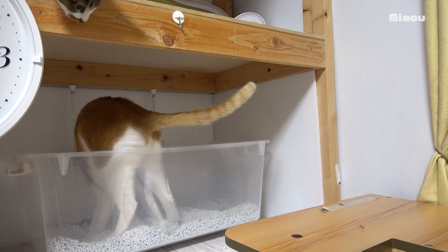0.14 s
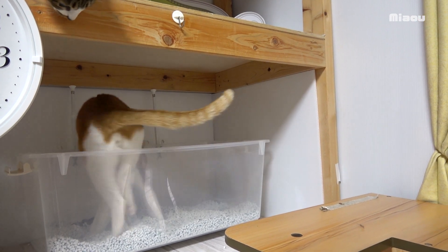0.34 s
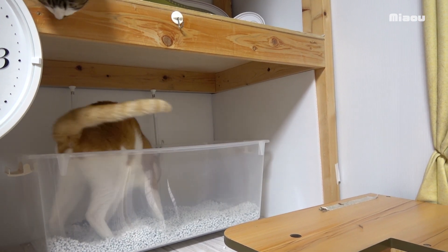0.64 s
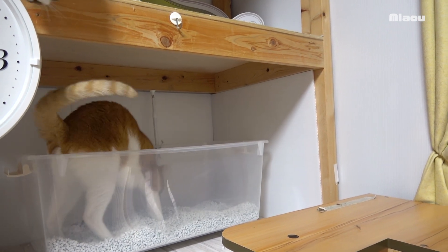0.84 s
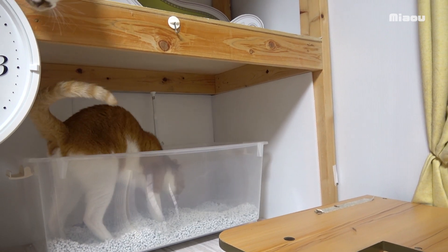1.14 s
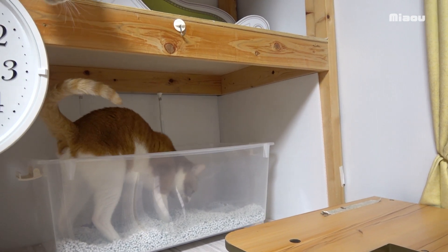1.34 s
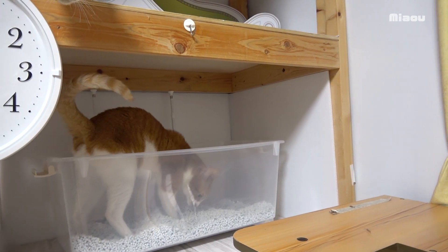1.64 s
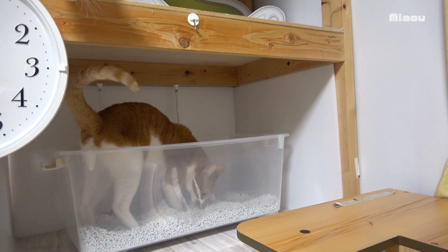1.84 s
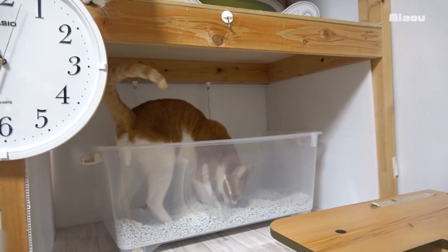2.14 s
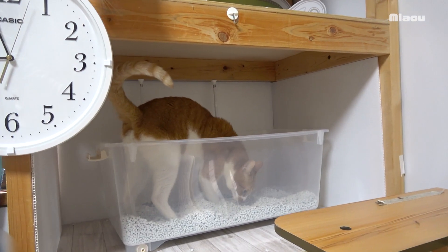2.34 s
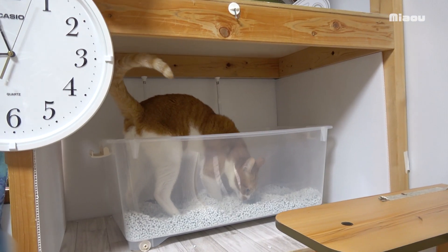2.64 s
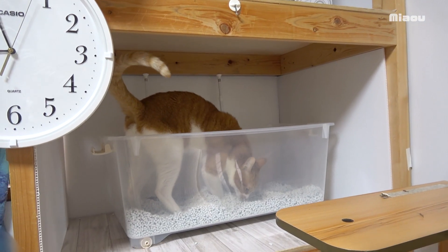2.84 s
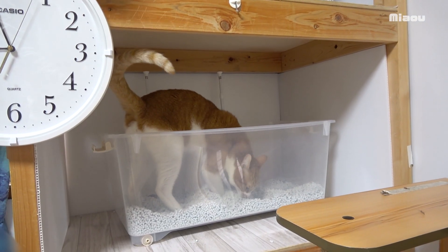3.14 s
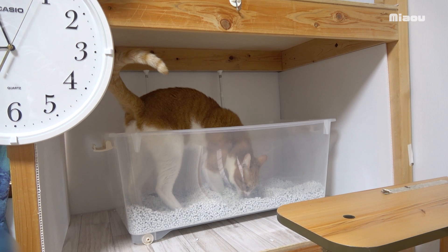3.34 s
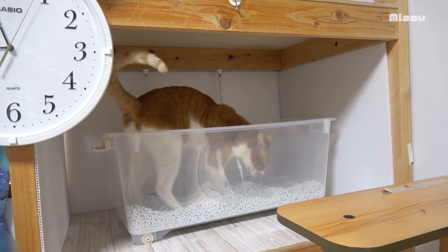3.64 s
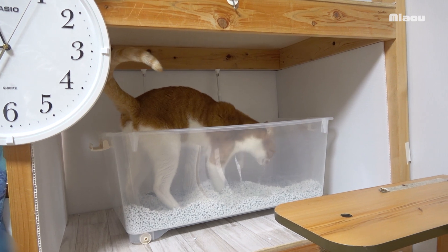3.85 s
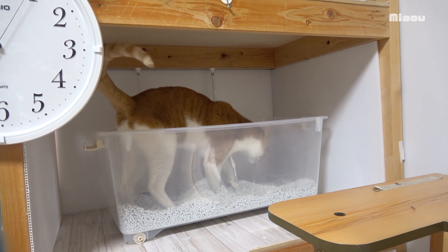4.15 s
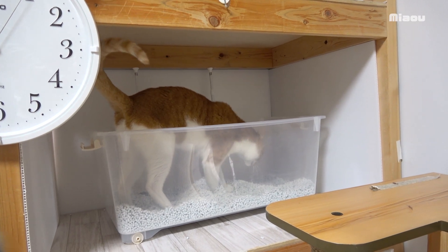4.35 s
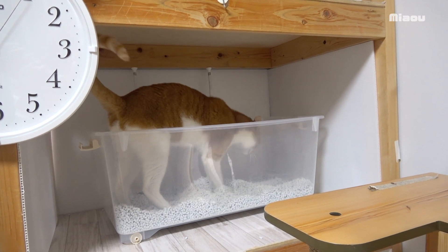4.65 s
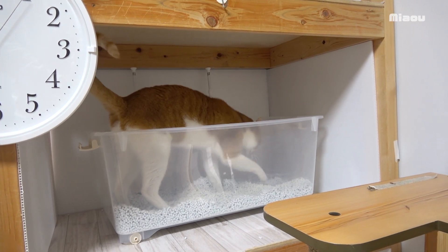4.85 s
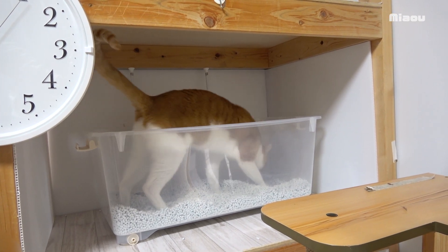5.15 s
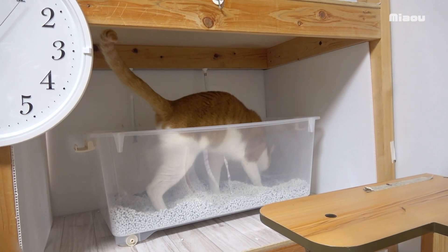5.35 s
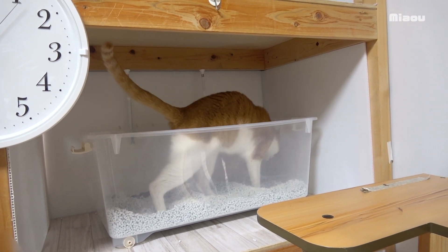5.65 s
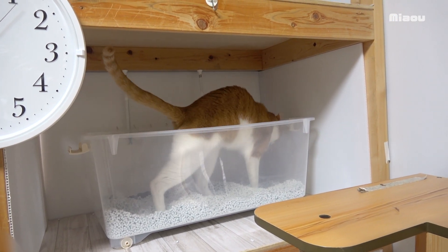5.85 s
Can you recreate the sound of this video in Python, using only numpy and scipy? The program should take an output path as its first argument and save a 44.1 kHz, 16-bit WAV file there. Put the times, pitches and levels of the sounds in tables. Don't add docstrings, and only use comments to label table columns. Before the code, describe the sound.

Bursts of gritty paw scraping through hard litter pellets, with sharp plastic knocks and rattles, soft thuds and a quiet gap before digging resumes.

```python
import sys
import numpy as np
from scipy import signal
from scipy.fft import rfft, irfft
from scipy.io import wavfile

SR = 44100
rng = np.random.default_rng(int(sys.argv[2]) if len(sys.argv) > 2 else 0)


def attenuation_scalar(level_db):
    decades = np.asarray(level_db, float) / 20
    return 10 ** decades


def dump_mix(stems):
    frames = np.atleast_2d(stems).T
    limited = np.clip(frames, -1, 1)
    pcm = np.round(limited * 32767).astype(np.int16)
    wavfile.write(sys.argv[1], SR, pcm)


N = 264600


def at_hz(points, hz):
    point_hz, level_db = np.transpose(points)
    return np.interp(np.log(hz), np.log(point_hz), level_db)


def in_time(rows):
    s, *columns = np.transpose(rows)
    return [np.interp(np.arange(N) / SR, s, column) for column in columns]


def rms_one(x):
    return x / np.sqrt(np.mean(x ** 2) + 1e-20)


def band(x, low_hz, high_hz):
    high_hz = min(high_hz, .45 * SR)
    return signal.sosfilt(signal.butter(2, [low_hz, high_hz], "band", fs=SR, output="sos"), x)


def drift(rate_hz):
    r = np.exp(-2 * np.pi * rate_hz / SR)
    wander = signal.lfilter([1], [1, -2 * r, r * r], rng.standard_normal(N + SR))
    return rms_one(wander[SR:])


def grains(per_s, spread_db):
    sizes = attenuation_scalar(spread_db * np.minimum(rng.exponential(1, N), 4))
    sizes = sizes * rng.choice([-1, 1], N)
    hits = rng.random(N) < per_s / SR
    return rms_one(sizes * hits + 1e-9)


def swells(rows, rest_db):
    s, peak_db, rise, hold, fall = np.transpose(rows)[:, :, None]
    t = np.arange(0, N + 64, 32) / SR
    before = (s - t) / np.maximum(rise, .004)
    after = (t - s - hold) / np.maximum(fall, .004)
    away = np.maximum(np.maximum(before, after), 0)
    rounding = 1.19
    power = np.sum(attenuation_scalar(peak_db - 20 * away ** rounding) ** 2, axis=0)
    moving_db = np.interp(np.arange(N) / SR, t, 10 * np.log10(power + 1e-30))
    return 10 * np.log10(attenuation_scalar(moving_db) ** 2 + attenuation_scalar(rest_db) ** 2)


# f/Hz, level/dB per Hz
ROOM_AIR = [(20, -7), (45, -4), (70, -26), (150, -28), (200, -4), (310, 9), (400, -9), (1000, -3),
            (2000, -7), (4000, -10.5), (6300, -16.5), (10000, -34), (13000, -36), (16000, -23)]


def room_noise():
    hz = np.maximum(np.fft.rfftfreq(N, 1 / SR), 1)
    air = irfft(rfft(rng.standard_normal(N)) * attenuation_scalar(at_hz(ROOM_AIR, hz)), N)
    level_db = -65 + 0.32 * drift(1)
    return attenuation_scalar(level_db) * rms_one(air)


# t/s of the height, rolling level/dB, rise/s per 20 dB, fall/s per 20 dB, bite/dB
PAW_STROKES = [(0.188, -37.5, .08, 0.01, -1.2), (.42, -58, 1.5, 0.53, 3.5), (0.663, -27, 0.1336, 0.07, -5),
               (.8, -48, 0.5, 0.39, -1.5), (1.242, -54.5, -0.04, 0.22, -1), (1.552, -42, 0.13, 0.08, -5),
               (1.873, -54.5, .15, 0.07, -2), (2.035, -27, -0.05, -0.01, -22),
               (2.64, -25.5, 0.0469, -0.1278, -1.5), (2.76, -57.5, -3.5, 0.2, 2.5),
               (3.125, -26.5, 0.0471, 0.14, -6.5), (3.176, -23, 0.0741, 0.1429, -4.5),
               (3.34, -69, -6, 0.16, -21), (4.609, -37, 0.1528, 0.26, -2), (4.721, -37, 0.17, 0.09, -1),
               (4.853, -36, .08, .1, -9), (5.1, -50, -0.3, 0.14, -2), (5.272, -28.5, 0.02, 0.075, -0.2),
               (5.35, -48, 0.37, 0.05, -17), (5.555, -42, 0.05, .06, -3.5), (5.61, -26, -0.012, 0.03, 7.5),
               (5.66, -37, 0.07, .12, 1.4), (5.719, -40.5, 0.05, 0.0066, 4.5),
               (4.521, -37, 0.1067, 0.24, -5)]
# t/s, rolling level/dB, hold/s, fall/s per 20 dB, bite/dB
PAW_LANDINGS = [(0.0, -42.5, 0.0031, 0.07, -5.5), (0.077, -44, 0.03, 0.2, -5.5),
                (0.144, -36, 0.036, 0.07, 0), (0.346, -42, 0.0094, -0.23, -5),
                (5.597, -34.5, 0.015, 0.01, -2), (.32, -49.5, 0.0089, -0.37, 0),
                (0.553, -34.5, .09, 0.0663, -3), (1.463, -59.5, .01, 0.02, 9.5),
                (1.997, -37.5, 0.1, 0.12, -8), (2.197, -49.5, 0.03, -0.5, -8),
                (2.328, -46, .02, 0.06, -18.6), (2.523, -28.5, 0.14, 0.0838, -8),
                (3.047, -34.5, 0.14, 0.09, -4.5), (3.917, -68.5, 0.018, 0.3, 4.5),
                (4.237, -57, 0.059, -7, -7), (4.371, -45.5, 0.033, 0.24, -4),
                (5.008, -46.5, 0.04, 0.43, -9), (5.157, -38, 0.081, 0.18, -8)]
# t/s, level/dB
CREEPING = [
    (0, -65),
    (1.1, -65),
    (2.3, -62),
    (2.9, -68),
    (3.02, -78),
    (3.5, -70.5),
    (4.2, -72),
    (5.5, -68),
    (5.87, -78),
    (6, -66),
]
CREEP_BALANCE = [0, -2, -4.5, -3.5]
# level/dB over rolling, share of the bite, extra dB per dB above firm
STROKE_BALANCE = [
    (0.5, 1.49, -0.1),
    (0, 0.18, 0),
    (-1.14, 1.21, -0.02),
    (-8.5, 1.05, 0.14),
]
LANDING_BALANCE = [
    (2.5, 1.04, 0),
    (-1, 0.18, 0.22),
    (-1, 1.03, 0.049),
    (-14.5, 0.18, .06),
]


def paw_levels():
    firm_db, landing_rise_s = -35, .015
    creep_db = in_time(CREEPING)[0]
    levels = []
    for pull, land, rest_db in zip(STROKE_BALANCE, LANDING_BALANCE, CREEP_BALANCE):
        rows = []
        for s, db, rise, fall, bite in PAW_STROKES:
            rows.append((s, db + np.dot(pull, [1, bite, db - firm_db]), rise, 0, fall))
        for s, db, hold, fall, bite in PAW_LANDINGS:
            rows.append((s, db + np.dot(land, [1, bite, db - firm_db]), landing_rise_s, hold, fall))
        levels.append(swells(rows, creep_db + rest_db))
    return levels


def rolling():
    clumps = attenuation_scalar(1.2 * drift(30)) * attenuation_scalar(0.5 * drift(190))
    knocks = grains(2000, spread_db=3.5)
    ticks = .35 * grains(90, spread_db=3.0)
    dust = .7 * rng.standard_normal((2, N))
    sources = [rms_one(clumps * (knocks + ticks + fine)) for fine in dust]
    return sources, [level_db - 0.8 for level_db in paw_levels()]


# t/s, peak level/dB, body level/dB over peak, wall ring f/Hz
HANDFULS = [(.0616, -27, -1.5, 1540), (.1296, -41, -5, 1420), (.576, -23, 7.5, 1900),
            (.8335, -20.5, -2.5, 1890), (1.231, -27.5, -9.5, 1770), (1.275, -27, -11, 1900),
            (1.3199, -28.5, -7.5, 1940), (2.379, -19, -19, 1700), (2.4109, -30, -19, 4870),
            (2.4293, -26.5, -16.5, 2070), (2.4995, -32, 7, 1760), (3.2824, -37, -33, 1430),
            (3.9115, -33, -1.5, 2150), (4.8549, -20.5, -31.5, 1880), (5.3224, -9.5, -11, 1830),
            (5.364, -26.5, 2, 1640), (5.538, -36, 3.5, 1450), (1.62, -37, 2, 1400), (3.261, -38, -6, 1550),
            (3.324, -38, 7, 1500)]
HARD_CRACKS = [(.4075, -25, -2, 1850), (.7967, -31, 4.5, 1480), (.885, -32, 1, 1240), (.9537, -34, 3, 1210),
               (1.4681, -24.5, 1, 1500), (1.542, -23, 5, 1430), (2.31, -12, -12, 3150),
               (2.341, -21, -9.5, 3170), (2.5146, -21.5, 2, 1270), (2.7886, -37, -17.5, 1850),
               (3.033, -29, 1.5, 1210), (3.048, -15, -1, 1880), (3.208, -26, 10, 1570),
               (5.0532, -30, -26, 1390), (5.6094, -15.5, 3.5, 2520), (5.699, -15, -0.5, 1430),
               (5.8571, -45.5, -16, 1240)]
SOFT_THUMPS = [(.121, -36, 14.5, 1450), (.3163, -31.5, 1.5, 1840), (.542, -43, 24, 1980),
               (1.984, -43.5, 19, 1940), (2.698, -36, -5, 1620), (3.1174, -20.5, -9, 1400),
               (3.3574, -35, 2, 1260), (4.299, -54.5, 20, 1370), (4.377, -38, 3, 1400),
               (4.5057, -27, 6.3, 1460), (4.834, -22.5, 1.8, 2150), (5.0, -30, -4.5, 1840),
               (5.153, -21, -2.5, 1270), (5.24, -19.5, -3, 1750), (5.6351, -6.5, -10, 1740)]


def flung():
    kinds = [(HARD_CRACKS, -1.3, 0.056), (HANDFULS, -10, .055), (SOFT_THUMPS, -20.5, 0.098)]
    return [(s, peak_db, body_db, grit_db, t60, hz)
            for rows, grit_db, t60 in kinds for s, peak_db, body_db, hz in rows]


def rattles():
    gains = np.full((4, N), 1e-7)
    t = np.arange(SR // 4) / SR
    knocks = grains(7600, spread_db=2.5)
    attack = 1 - np.exp(-t / 0.00055)
    for s, peak_db, body_db, grit_db, t60, hz in flung():
        i = round(s * SR)
        knocks[i + 15] = 6.0
        zones = [(body_db - 3.0, 1.4), (body_db + 0.5, 1.2), (0, 1), (grit_db, .8)]
        for z, (level_db, linger) in enumerate(zones):
            shape = attack * attenuation_scalar(-60 * t / (max(t60, .01) * linger))
            gains[z, i:i + len(t)] += (attenuation_scalar(peak_db + level_db - 14) * shape)[:N - i]
    return [knocks, knocks], 20 * np.log10(gains)


# f/Hz, level/dB per Hz
PELLET_TONE = [(70, -44), (130, -24), (220, -11), (360, -5.5), (500, -1.5), (870, -6.5), (1300, -4.5),
               (2100, -6), (5000, -12.5), (10400, -23), (11800, -27), (15500, -34)]
ZONE_CENTRES = [420, 1000, 2800, 8500]


def coloured(layers):
    edges = 70 * 2 ** np.arange(0, 8.1, .4)
    centres = np.sqrt(edges[1:] * edges[:-1])
    density_db = at_hz(PELLET_TONE, centres)
    power = attenuation_scalar(density_db) ** 2 * np.diff(edges)
    zone = np.digitize(centres, [700, 1500, 5000])
    zone_db = [10 * np.log10(power[zone == z].sum() * 2.2 / SR) for z in range(4)]
    patches = 1.3 * drift(18)
    out = np.zeros(N)
    for k, hz in enumerate(centres):
        place = np.interp(np.log(hz), np.log(ZONE_CENTRES), np.arange(4))
        low = min(int(place), 2)
        up = place - low
        patch_db = np.roll(patches, k * N // len(centres))
        drive = 0
        for sources, levels_db in layers:
            low_db = levels_db[low] - zone_db[low]
            high_db = levels_db[low + 1] - zone_db[low + 1]
            blend_db = (1 - up) * low_db + up * high_db
            drive = drive + sources[k % 2] * attenuation_scalar(blend_db + density_db[k] + patch_db)
        out += band(drive, edges[k], edges[k + 1]) * (-1) ** k
    return out


# f/Hz, width/Hz, boost level/dB
TUB_MODES = [(220, 40, 4), (315, 30, 3), (370, 40, 4), (460, 60, -4), (600, 80, 4), (520, 60, -4),
             (690, 40, -2), (750, 60, -3), (900, 120, 5), (1030, 90, 4), (1440, 90, 2), (1830, 120, .3),
             (2600, 200, 3)]


def tub(x):
    for hz, width_hz, boost_db in TUB_MODES:
        r = np.exp(-np.pi * width_hz / SR)
        poles = [1, -2 * r * np.cos(2 * np.pi * hz / SR), r * r]
        ring = signal.lfilter([(1 - r * r) / 2, 0, (r * r - 1) / 2], poles, x)
        x = x + (attenuation_scalar(boost_db) - 1) * ring
    return attenuation_scalar(-1.5) * band(x, 148, 26000)


def wall_rings():
    out = np.zeros(N)
    t = np.arange(SR // 10) / SR
    attack = 1 - np.exp(-t / 0.0017)
    for s, peak_db, body_db, grit_db, t60, hz in flung():
        i = round(s * SR)
        swell = attack * attenuation_scalar(peak_db - 16.5 - 60 * t / (0.7 * max(t60, .01)))
        out[i:i + len(t)] += (swell * np.sin(2 * np.pi * hz * t))[:N - i]
    return out


def reverb(x, t60, cut_hz):
    t = np.arange(SR // 2) / SR
    tail = band(rng.standard_normal(len(t)), 67, cut_hz)
    tail = tail * attenuation_scalar(-60 * t / t60) * (1 - np.exp(-t / 0.0018))
    return signal.fftconvolve(x, tail / np.sqrt(np.sum(tail ** 2)))[:N]


# t/s, level/dB, rise/s per 20 dB, fall/s per 20 dB
WEIGHT_SHIFTS = [(.17, -46, 0.056, .045), (.28, -43.5, 0.032, 0.03), (.45, -54.5, 0.054, .05),
                 (.56, -61, .06, .3), (.68, -52, 0.22, 0.083), (.82, -55, 0.079, 0.16),
                 (.97, -56, .08, 0.063), (1.045, -51, .06, 0.087), (1.17, -58, 0.094, 0.062),
                 (1.44, -61, 0.13, 0.24), (1.6, -57.5, 0.7, 0.038), (1.74, -71, 0.092, .4),
                 (1.95, -49.5, 0.36, 0.18), (2.12, -54.5, .4, .08), (2.34, -57, 0.13, 0.13),
                 (2.52, -49, 0.042, 0.26), (2.87, -72.5, .06, .08), (3.04, -63, 0.027, 0.36),
                 (4.61, -64, 0.29, 0.25), (4.7, -74.5, .2, 1.2), (5.3, -63, 0.29, 0.15),
                 (5.46, -64, 0.026, 0.19), (5.63, -54.5, 0.054, 0.16)]


def steps():
    thud = rms_one(band(band(rng.standard_normal(N), 78, 158), 40, 213))
    rows = np.insert(WEIGHT_SHIFTS, 3, 0, axis=1)
    level_db = swells(rows, rest_db=-83) + 0.5 * drift(7.2)
    return attenuation_scalar(level_db) * thud


# t/s of the middle, level/dB, f/Hz, length/s
FOOTFALLS = [(.17, -43.5, 183, .05), (.28, -67, 98, 0.066), (.97, -48, 91, .08), (1.039, -50, 148, 0.034),
             (1.061, -49.5, 90, 0.059), (1.165, -58, 156, 0.041), (1.48, -49.5, 100, .08),
             (1.92, -46, 134.4, 0.04), (3.189, -31, 340, .05), (2.038, -40, 408, 0.03),
             (1.943, -44, 75.6, 0.0784), (3.665, -65.5, 215, 0.05), (5.615, -36, 190, .04)]


def thuds():
    out = np.zeros(N)
    for s, level_db, hz, length in FOOTFALLS:
        count = round(length * SR)
        i = round(s * SR) - count // 2
        flex = 2 * np.sin(2 * np.pi * hz * np.arange(count) / SR)
        out[i:i + count] += attenuation_scalar(level_db) * np.hanning(count) * flex
    return out


# t/s, level/dB, f/Hz, width/Hz, length/s
NOSE_PUFFS = [
    (1.62, -75.5, 9000, 60, 0.23),
    (1.745, -77, 11600, 120, .05),
    (3.583, -66.5, 7640, 1500, 0.045),
    (3.679, -60, 11400, 3500, 0.043),
    (4.343, -56, 6740, 1200, 0.023),
    (5.855, -65, 7040, 1200, 0.035),
    (5.9, -70, 6800, 1210, 0.036),
]


def sniffs():
    out = np.zeros(N)
    air = rng.standard_normal(SR // 2)
    for s, level_db, hz, width_hz, length in NOSE_PUFFS:
        i = round(s * SR)
        t = np.arange(round(length * SR)) / (length * SR)
        puff = rms_one(band(air, hz - width_hz / 2, hz + width_hz / 2)[-len(t):])
        out[i:i + len(t)] += attenuation_scalar(level_db) * puff * np.minimum(t / 0.11, 1) * (1 - t)
    return out


# t/s, level/dB
MOTOR_SWELL = [
    (3.6, -100),
    (3.78, -77),
    (4.05, -73),
    (4.42, -77),
    (4.55, -100),
]


def hum():
    phase = 2 * np.pi * 73.5 * np.arange(N) / SR + 0.34 * drift(3.3)
    return attenuation_scalar(in_time(MOTOR_SWELL)[0]) * np.sqrt(2) * np.sin(phase)


def scene():
    litter = tub(coloured([rolling(), rattles()])) + wall_rings()
    nook = attenuation_scalar(-13) * reverb(litter, .08, cut_hz=14000)
    room = attenuation_scalar(-17.0) * reverb(litter, 0.12, cut_hz=12000)
    cat = steps() + thuds() + sniffs()
    return (litter + nook + room + cat + hum() + room_noise())[None]


def roll_off(x):
    return signal.sosfilt(signal.butter(12, 16110, fs=SR, output="sos"), x)


def record(dry):
    mix = signal.sosfilt(signal.cheby2(12, 70, 16520, fs=SR, output="sos"), dry)
    return roll_off(mix)


dry = scene()
out = record(dry)
dump_mix(out)
```